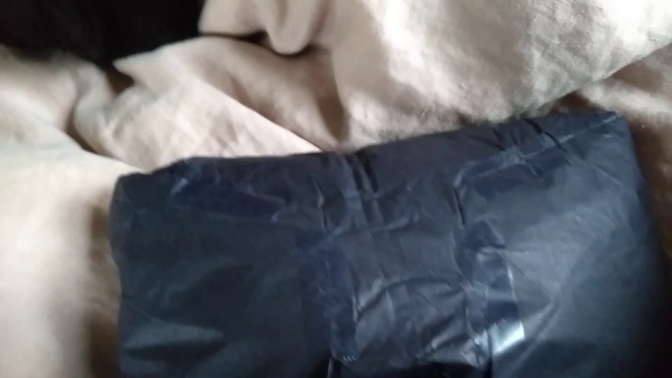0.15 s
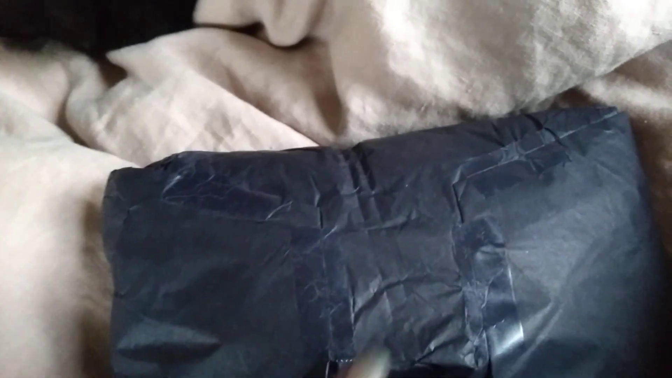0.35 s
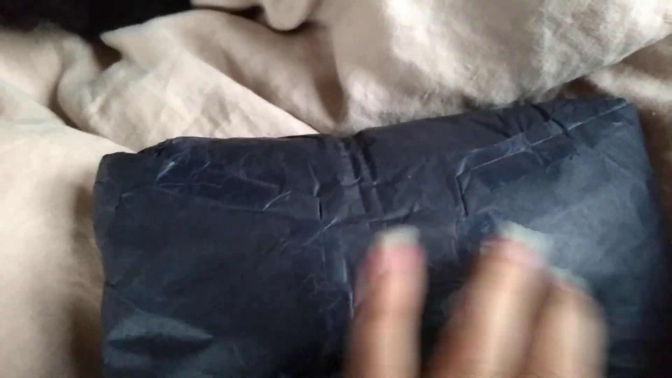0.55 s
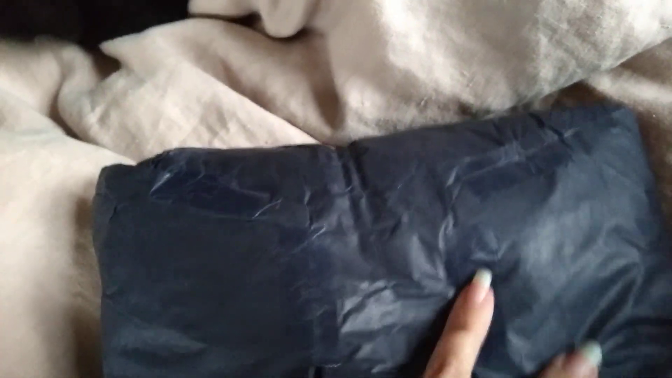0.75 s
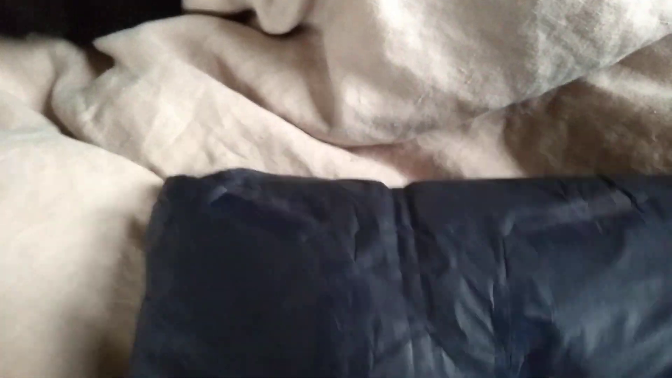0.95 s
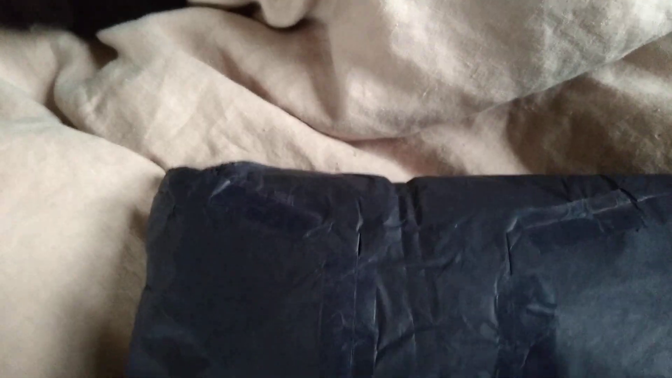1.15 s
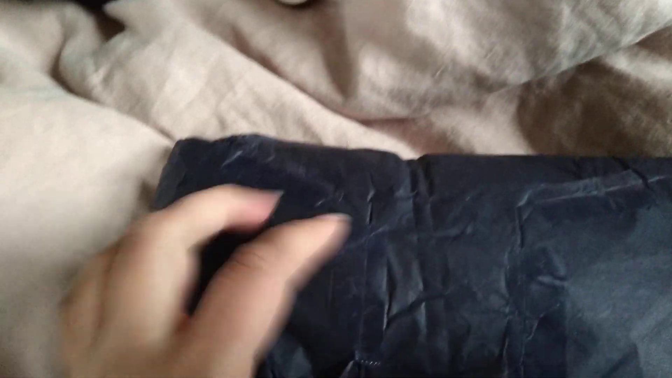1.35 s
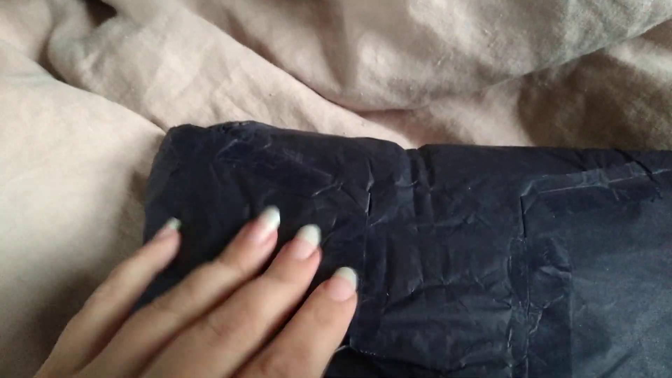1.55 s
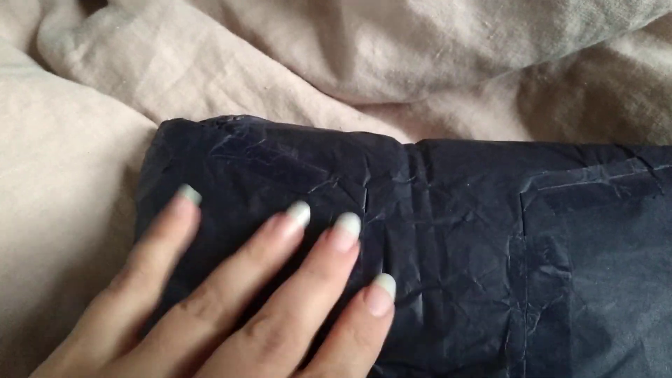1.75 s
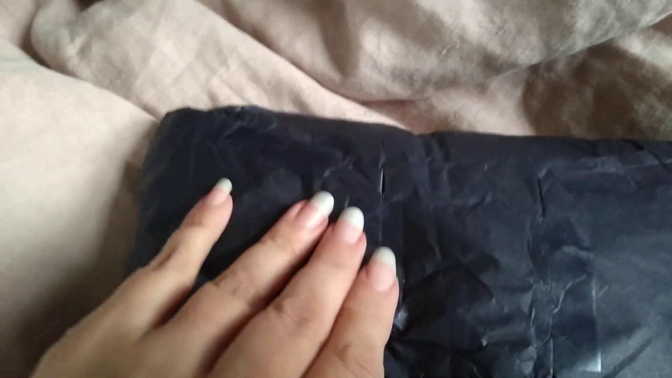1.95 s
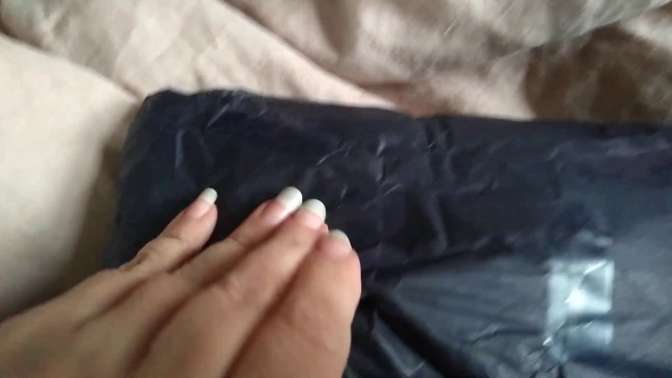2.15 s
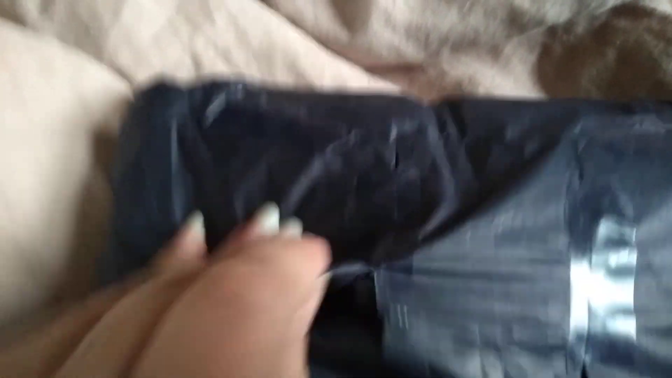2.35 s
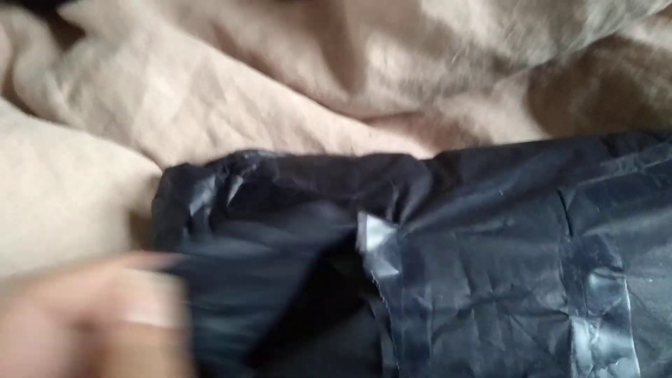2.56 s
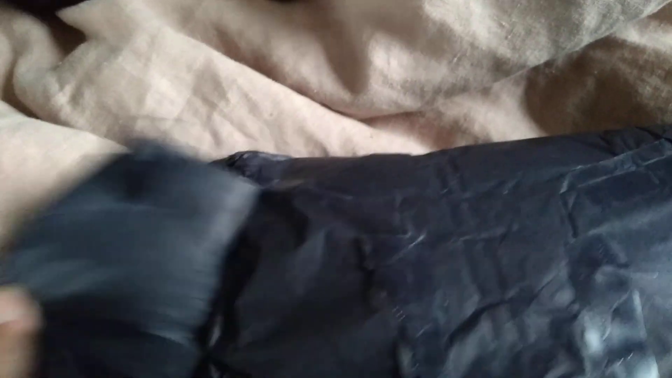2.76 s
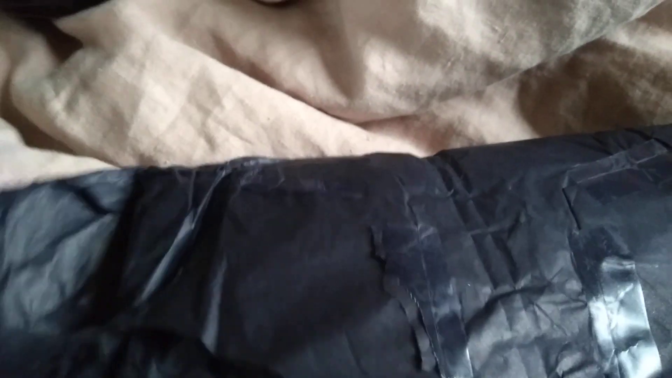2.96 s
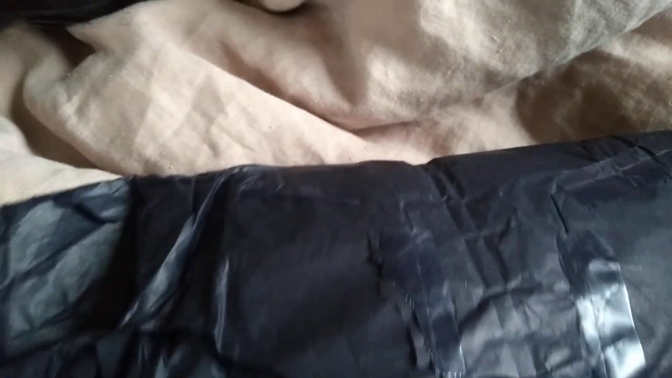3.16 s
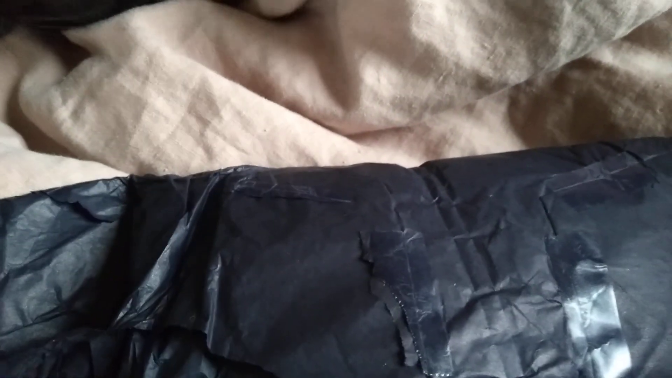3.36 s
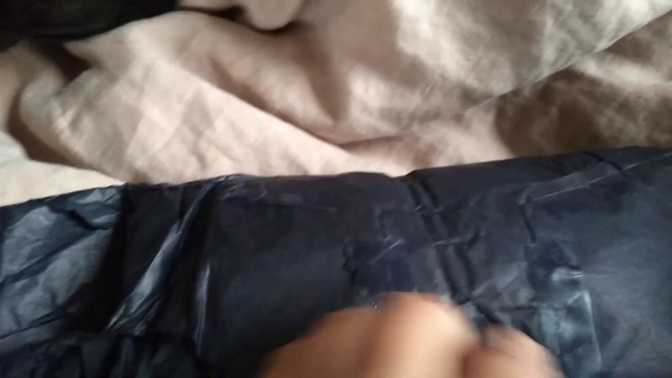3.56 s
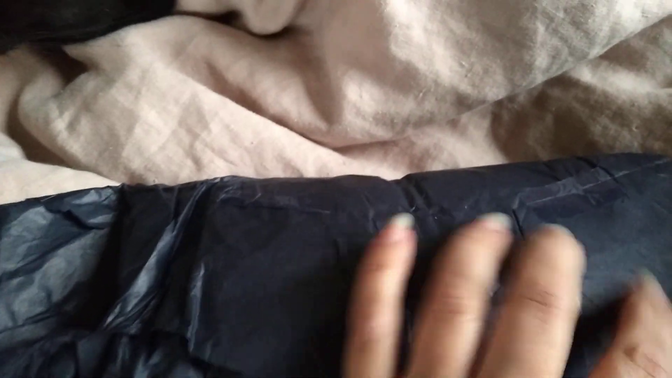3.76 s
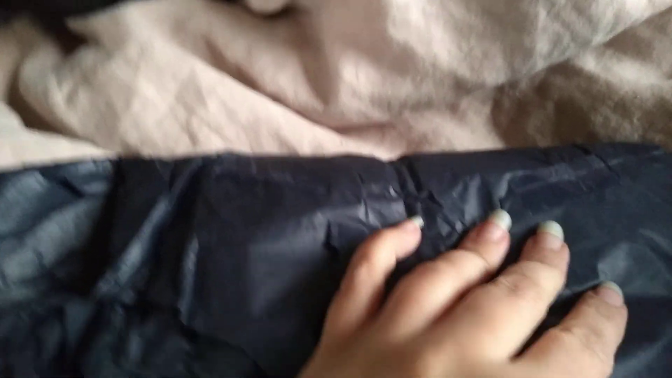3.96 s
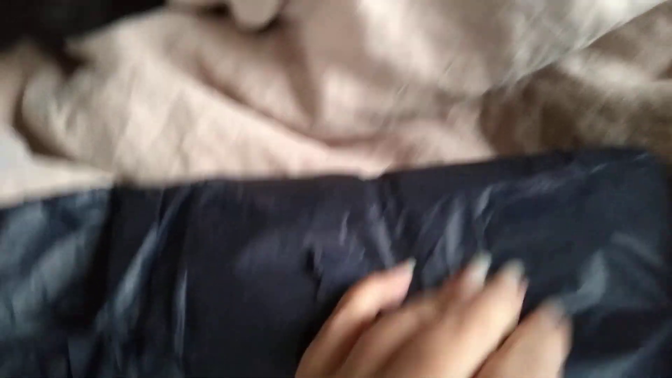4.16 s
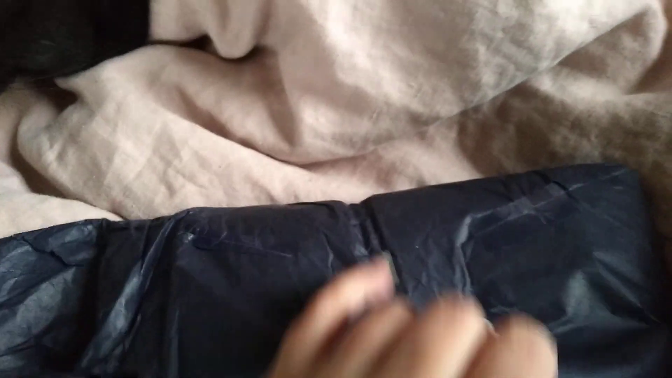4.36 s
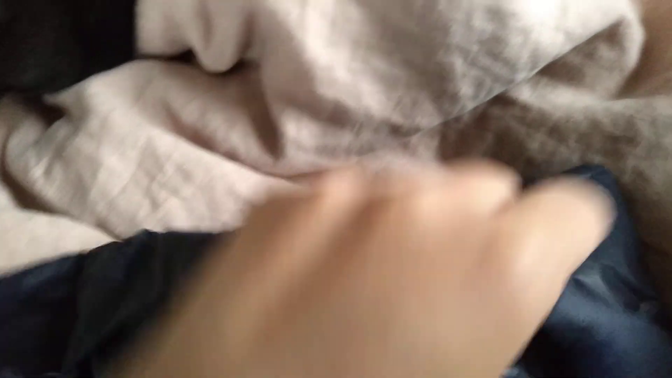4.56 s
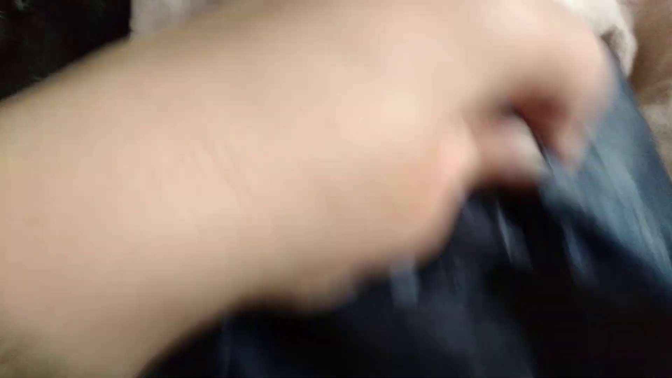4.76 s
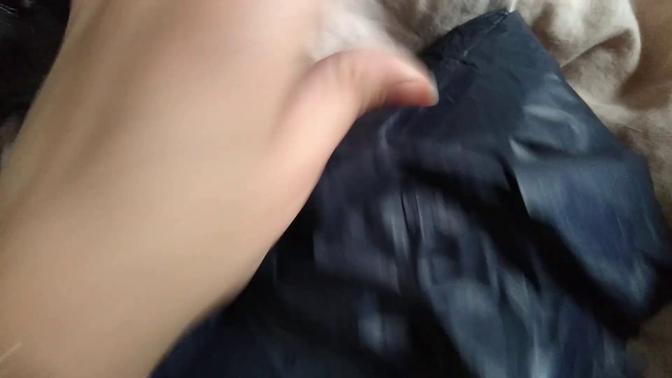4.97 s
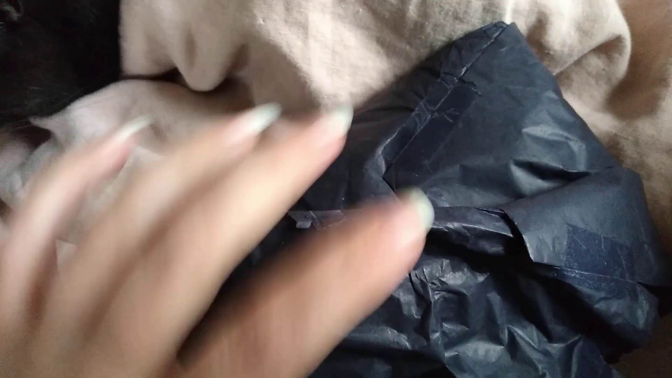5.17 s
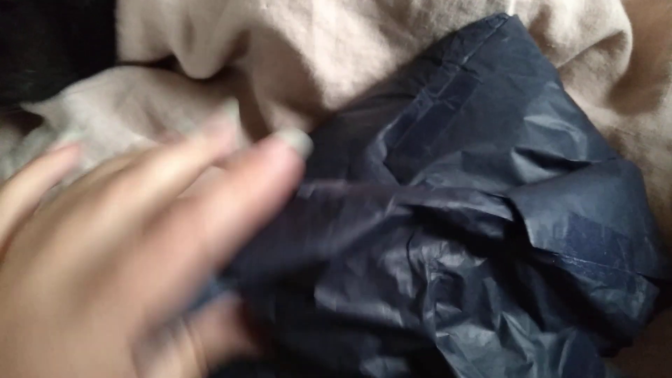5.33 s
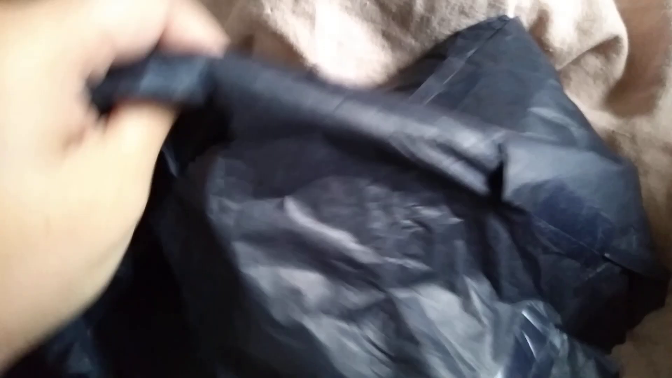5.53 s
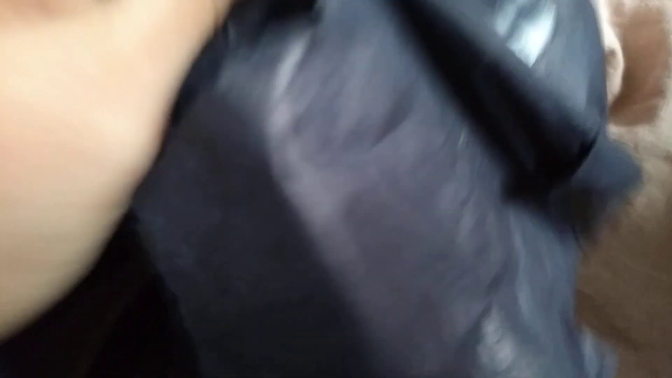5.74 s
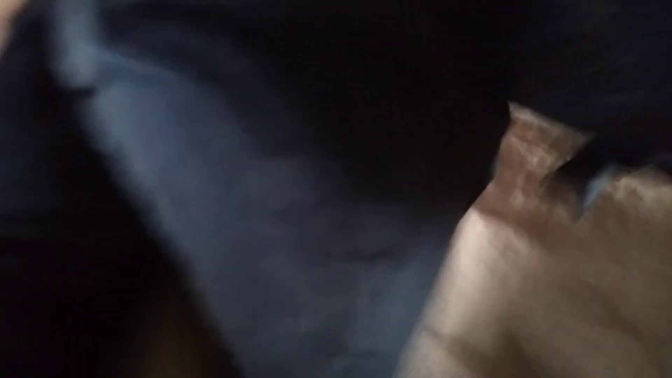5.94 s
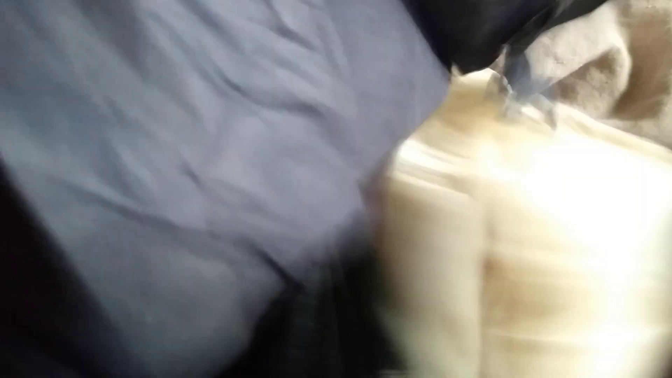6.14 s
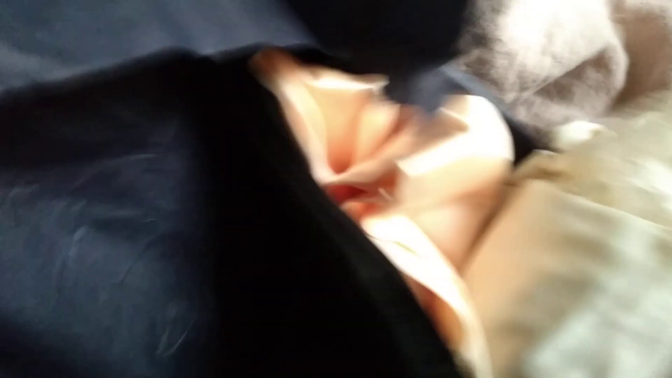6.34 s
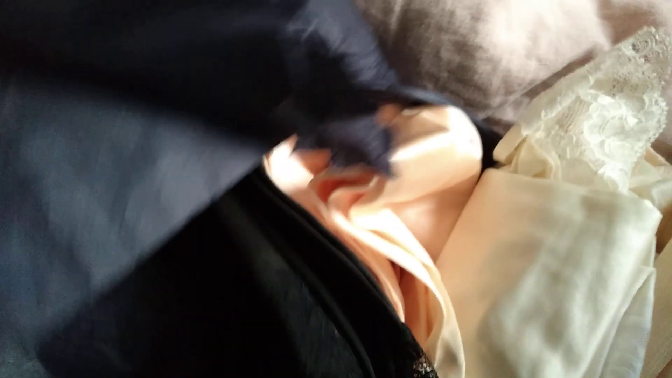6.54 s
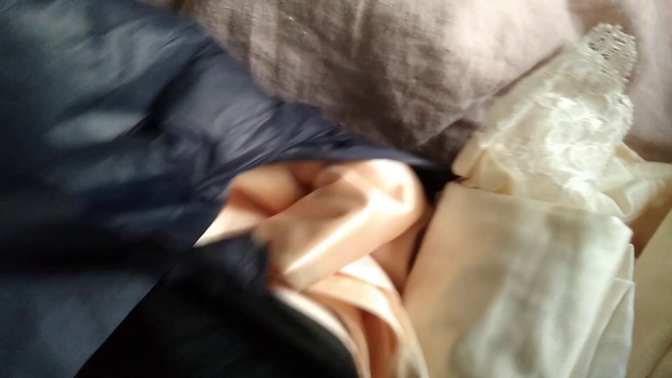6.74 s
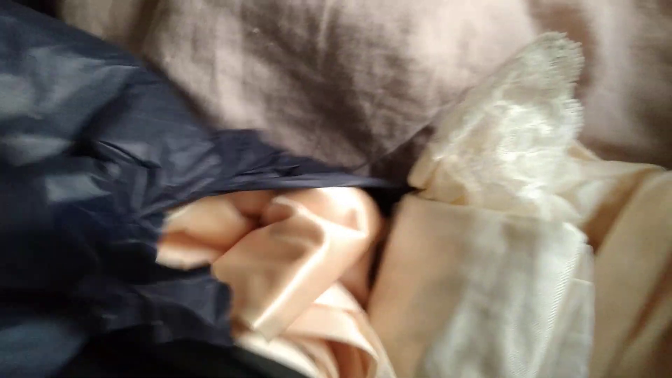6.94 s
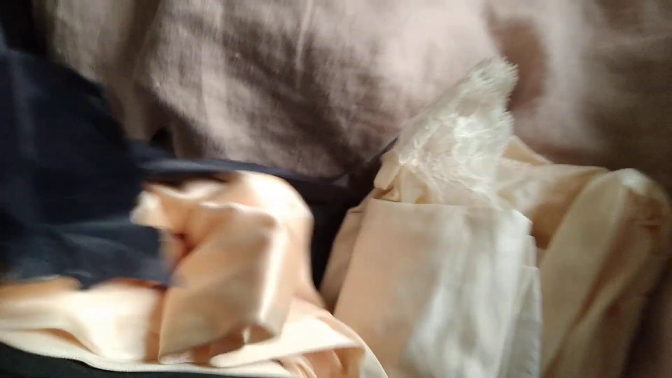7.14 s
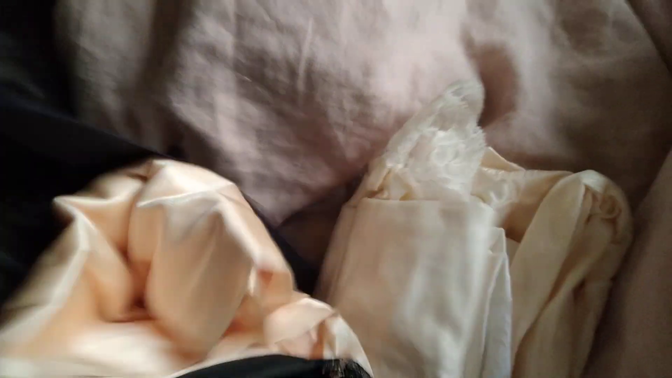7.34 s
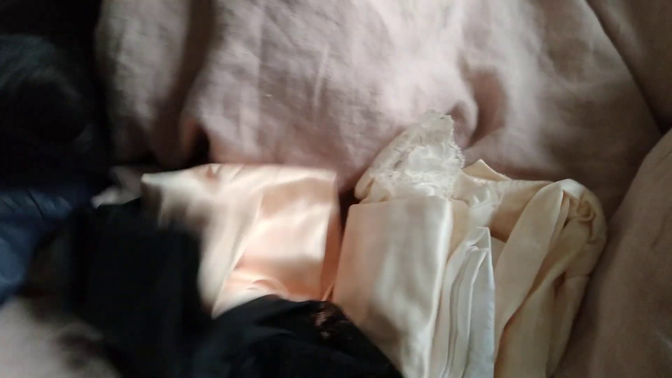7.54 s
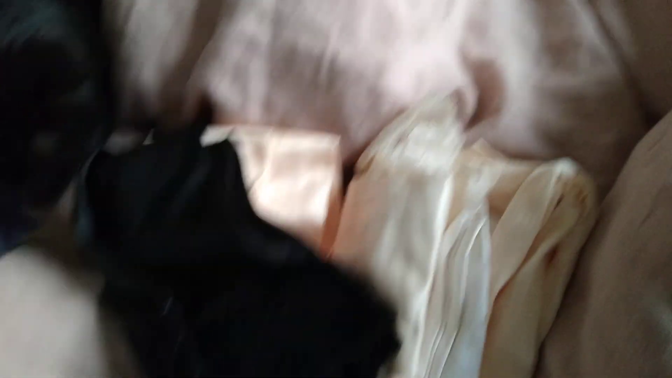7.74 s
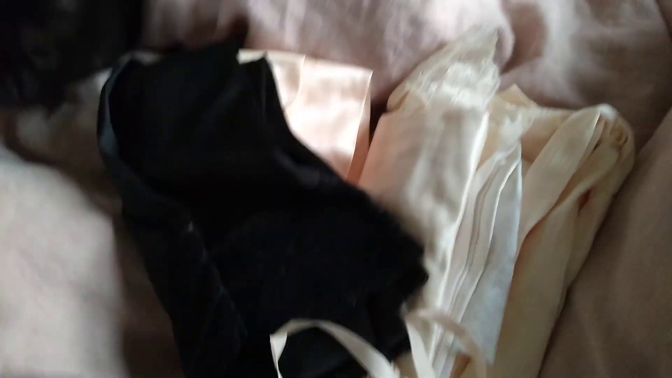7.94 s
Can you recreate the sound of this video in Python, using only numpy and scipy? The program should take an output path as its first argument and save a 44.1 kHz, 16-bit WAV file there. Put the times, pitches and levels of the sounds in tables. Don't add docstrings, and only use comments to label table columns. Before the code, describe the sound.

Bright, brittle crackle of thin wrapping in a soft, quiet room, recorded close in stereo by a phone with a ringing, sharp treble. Gentle uneven strokes come first, then a strong rip with dense snaps, a short hush, renewed rustling, and a long loud unfolding with low flapping thumps of air. It ends in sparse, faint settling crackles.

```python
import sys
import numpy as np
from scipy import signal
from scipy.io import wavfile
from scipy.ndimage import uniform_filter1d

SR = 44100
rng = np.random.default_rng(int(sys.argv[2]) if len(sys.argv) > 2 else 0)


def linear_from_db(decibels):
    return 10 ** (np.asarray(decibels, float) / 20)


def wav_record(signal):
    frames = np.transpose(np.atleast_2d(signal))
    bounded = np.clip(frames, -1, 1)
    quanta = np.round(bounded * 32767).astype(np.int16)
    wavfile.write(sys.argv[1], SR, quanta)


N = 352787


def rms_one(x):
    return x / np.sqrt(np.mean(x ** 2) + 1e-20)


def in_time(rows):
    seconds, *columns = np.transpose(rows)
    return [np.interp(np.arange(N) / SR, seconds, column) for column in columns]


def at_hz(points, hz):
    point_hz, value = np.transpose(points)
    return np.interp(np.log(hz), np.log(point_hz), value)


def drift(rate_hz):
    r = np.exp(-80 * np.pi * rate_hz / SR)
    white = rng.standard_normal(N // 40 + 2002)
    slow = signal.lfilter([1], [1, -2 * r, r * r], white)[2000:]
    return np.interp(np.arange(N) / 40, np.arange(len(slow)), rms_one(slow))


def bands():
    wide = np.geomspace(40, 5000, num=15)
    narrow = np.geomspace(5000, 18000, num=10)
    edges = np.concatenate([wide, narrow[1:]])
    return zip(edges, edges[1:])


def port_noise(lag):
    late = np.clip(np.arange(N) - np.round(lag).astype(int), 0, N - 1)
    return [(np.array([a[late], a]), np.array([b[late], -b])) for a, b in rng.standard_normal((2, 2, N))]


def band_noise(white, low, high, envelope):
    # f/Hz, correlation
    port_likeness = [(60, .85), (180, .92), (550, .92), (1100, .75), (2200, .58), (4500, .28), (9000, .05)]
    alike = np.clip(at_hz(port_likeness, np.sqrt(low * high)), -1, 1)
    shared, opposed = white
    pair = np.sqrt(1 + alike) * shared + np.sqrt(1 - alike) * opposed
    band = signal.butter(2, [low, high], "band", fs=SR, output="sos")
    return signal.sosfilt(band, pair * envelope)


def effort():
    # start/s, length/s, level at start/dB, level at end/dB
    hand_strokes = [(0.0, 0.18, -29.5, -43.5), (0.173, .2, -35.5, -33.5), (0.41, 0.076, -45.5, -41),
                    (0.54, 0.095, -31.5, -34), (0.653, 0.28, -28, -31), (1.006, 0.22, -36, -34.5),
                    (1.273, .12, -37, -35), (1.43, 0.095, -43.5, -37), (1.572, 0.14, -31.5, -43),
                    (1.742, 0.1, -42, -50.5), (1.896, 0.12, -54, -36), (2.12, 0.26, -40, -38.5),
                    (2.424, .19, -28.5, -14.5), (2.609, 0.16, -16, -18), (2.818, 0.086, -22, -20),
                    (2.954, 0.085, -25, -26), (3.106, 0.087, -34.5, -34.5), (3.29, 0.17, -63.5, -76.5),
                    (3.628, 0.1, -41, -33.5), (3.749, 0.045, -34, -29), (3.822, 0.1, -39, -35.5),
                     (3.965, 0.12, -28.5, -39.5), (4.13, 0.16, -39, -29), (4.332, 0.11, -37, -29),
                     (4.483, 0.097, -34, -32.5), (4.607, 0.23, -32.5, -24.5), (4.897, 0.079, -31, -29.5),
                     (4.989, 0.17, -39.5, -43.5), (5.238, 0.09, -53, -47), (5.318, .13, -35.5, -33.5),
                    (5.467, 0.21, -25.5, -24), (5.693, 0.21, -25.5, -22), (5.934, 0.27, -24.5, -23),
                    (6.241, 0.23, -27, -44.5), (6.462, 0.11, -28.5, -32), (6.598, .26, -32, -33.5),
                    (6.874, 0.23, -33.5, -30.5), (7.074, .22, -31.5, -29), (7.321, 0.12, -30.5, -29),
                    (7.446, 0.096, -39.5, -32), (7.558, 0.22, -39.5, -47), (7.798, 0.17, -49, -55.5)]
    attack_db_per_s, release_db_per_s = 751.5, 277.5
    t = np.arange(0, N + 40, 40) / SR
    power = 1e-10
    for start, length, first_db, last_db in hand_strokes:
        progress = np.clip((t - start) / max(length, .01), 0, 1)
        held_db = first_db + (last_db - first_db) * progress
        rise_db = attack_db_per_s * np.maximum(start - t, 0)
        fall_db = release_db_per_s * np.maximum(t - start - length, 0)
        power = power + linear_from_db(2 * (held_db - rise_db - fall_db))
    return np.interp(np.arange(N) / SR, t, 10 * np.log10(power))


def folds(effort_db):
    per_s, over_effort_db, spread_db, pan_db, sheet_db = 45, 10, 3, 5, -22
    gap, size, side, tone = rng.standard_normal((400, 4)).T
    start = np.cumsum(np.abs(gap)) * 1.25 / per_s
    db = np.interp(start * SR, np.arange(N), effort_db) + over_effort_db + spread_db * size
    rows = zip(start, db, pan_db * side, sheet_db + 2.5 * tone)
    return [row for row in rows if row[0] * SR < N - 1]


def crinkle(per_s, clump_db):
    chance = per_s * linear_from_db(clump_db * drift(25)) / SR
    at = np.flatnonzero(rng.random(N) < chance)[:N // 8]
    size, side, pitch = rng.random((N // 8, 3))[:len(at)].T
    size_db = 3.6 * np.minimum(-np.log(size + 1e-9), 3.4)
    pan_db = 10 * (side - .5) * [[1], [-1]]
    power = linear_from_db(2 * (size_db + pan_db))
    return at, power / np.mean(power) * SR / 16 / per_s, np.log2(300) + 5.8 * pitch


def burst(at, power, ms):
    r = np.exp(-1000 / (ms * SR))
    spikes = np.array([np.bincount(at, side, N) for side in power]) + 1e-18
    return signal.lfilter([np.e * (1 - r)], [1, -2 * r, r * r], spikes)


def large_snaps(rows, shortest_ms, longest_ms):
    treble, sheet = np.zeros((2, 2, N))
    lengths = shortest_ms + (longest_ms - shortest_ms) * rng.random((500, 1))[:, 0]
    for (start, db, pan_db, sheet_db), ms in zip(rows, lengths):
        i = round(start * SR)
        t = np.arange(min(600, N - i)) / SR * 1000 / max(ms, .2)
        pulse = (t * np.exp(1 - t)) ** 2
        snap = pulse * linear_from_db(2 * db + pan_db * np.array([[1], [-1]]))
        treble[:, i:i + len(t)] += snap
        sheet[:, i:i + len(t)] += snap * linear_from_db(2 * sheet_db)
    return treble, sheet


def paper():
    # f/Hz, level per Hz/dB
    paper_colour = [(26, -56), (45, -37), (72, -11), (120, -6.5), (328, -4), (462, -8), (719, -3),
                    (1500, -4.5), (2840, -7), (5370, -3), (7760, 1.5), (10200, 3), (12100, -2), (14700, -4),
                    (15800, -20)]
    # f/Hz, left-right/dB
    port_lean = [(60, -1), (240, -1), (480, -1.5), (950, 0), (1890, 4.5), (7300, 4.5), (10000, -4),
                 (14000, 2.5)]
    zone_hz = 100, 300, 1700, 2100, 3500, 6500
    zone_shares = [
        (1, 0, 0, 0, 0, 0),
        (0, 1, 1, 0, 0, 0),
        (0, 0, 0, 1, 1, 0),
        (0, 0, 0, 0, 0, 1),
    ]
    # t/s, slack/dB, weight on the parcel/dB, flapping/dB, left-right/dB
    grip = [(0.0, 6, 2.5, 5, -2), (.4, -1.5, -1, 2, -1), (.6, 0.5, -0.5, 0, 2), (1.25, 5.5, 5, 6, 1),
            (1.5, -10, 3, 3, 2.5), (2.35, 3, 0, -6, 2.5), (2.7, -2, -3.5, -4, -1), (3.2, 5, -5, -11, -6),
            (3.5, -5, -3, 2.5, 0), (3.7, 4.5, 3.5, 6, 5), (4.5, 5, 0, -12, 1), (4.9, 4.5, 2, 10, 2),
            (5.3, -0.5, -2.5, -14, 2.5), (5.65, 3, -0.5, 10.5, -1.5), (5.95, 1, -1, 3.5, -4),
            (6.3, 3, 1.5, 11, -1.5), (7.0, 2, -1.5, 5, -1.5), (8.0, 6, -1.5, 1, -5)]
    # t/s, delay of the left port/samples
    place = [(0, 10), (.45, 10), (.55, -2), (1.4, -2), (1.5, 8), (2.7, 9), (2.76, 13), (3.5, 13), (3.6, -1),
             (5.3, 1), (5.5, 13), (7, 14), (7.3, 17), (8, 13)]
    # t/s, peak/dB, left-right/dB, sheet re peak/dB
    crease_snaps = [(0.0697, -17, -10, -23), (0.2493, -14.5, -5, -12.5), (0.4363, -18.5, -0.5, -14),
                    (0.5267, -15, 11, -29), (0.5472, -16, 10, -23), (0.7781, -8.5, 0.5, -18),
                    (1.1927, -22, -9, -23), (1.5015, -22.5, 2, -15), (1.5673, -26, 3, -20),
                    (1.6737, -18, 10, -17), (2.2784, -12.5, -1, -14.5), (2.3548, -15, 5, -25),
                    (2.3835, -19, 2, -25), (2.4249, -12, 1.5, -30), (2.481, -9, 14, -16),
                    (2.5214, -4, 9, -22), (2.562, -2, 6, -29), (2.605, -10, 1.5, -10),
                    (2.8499, -0.5, -3, -22.5), (2.9992, 1, -5, -21), (3.034, -3, -6, -11.5),
                    (3.0639, -10, -3.5, -18), (3.074, -12.5, -2.5, -13.5), (3.1011, -6.5, -3.5, -14),
                    (3.1114, -13.5, -3, -14), (3.1396, -4, -2, -18), (3.168, -14, -2, -31),
                    (3.6027, -27.5, 3, -14), (3.774, -10.5, -3, -30), (3.86, -16, 0.0, -26),
                   (4.15, -16, -0.5, -23), (4.1723, -11.5, 1, -14.5), (4.2383, -15.5, 15, -8),
                   (4.366, -13, -6, -15), (4.4113, -11.5, -20, -17), (4.6533, -11.5, -7, -23),
                   (4.7242, -13, 9, -23), (4.811, -16, 5, -23), (5.456, -8.5, -1.5, -25),
                   (5.579, -3, -6, -12), (5.687, -8, -5.5, -25), (5.737, -7, -12, -23),
                   (5.878, -2, -17, -30), (5.945, -5, -2, -17), (5.972, -7, -8.0, -16),
                   (5.9774, -9, -9, -21), (6.0302, -8, -5.0, -23), (6.061, -13, -11, -27),
                   (6.1429, -9, -9, -23), (6.4532, -17, -3.5, -23), (6.7202, -13, -1.0, -9),
                   (6.776, -13, -1, -7), (6.9022, -8.5, 6, -21), (7.092, -12.5, -5, -16),
                   (7.33, -12, -4.0, -16)]
    # t/s, peak/dB, left-right/dB, sheet re peak/dB
    ticks = [(1.7804, -20.5, -11, -20), (1.8837, -27, 0, -16), (2.1028, -26, 2.0, -8),
             (3.237, -22.5, -2, -25), (3.271, -33, -8, -25), (3.3782, -40, -1, -12), (3.4104, -35, -1, -17),
             (3.4434, -53, -4.5, -19), (3.4804, -55, -0.5, -18), (3.5395, -40.5, -1, -21),
             (5.1217, -19.5, -2, -11), (5.245, -28, 3, -20), (6.3864, -20, -9, -26), (7.5965, -22, -7, -20),
             (7.645, -20, 0, -20), (7.699, -27, -14, -26), (7.7278, -25, -10.5, -22),
             (7.7275, -16, -4.0, -24), (7.756, -30, -4.0, -18), (7.8406, -33, -5.0, -20),
             (7.8393, -27.5, -2, -12), (7.892, -24, -9, -36), (7.9217, -25, 0, -12),
             (7.9944, -31, -9.5, -18)]

    treble_db = effort()
    slack_db, weight_db, flap_db, pan_db = in_time(grip)
    body_db = weight_db - 0.056 * (treble_db + 32)
    rows = crease_snaps + ticks + folds(treble_db)
    at, power, pitch = crinkle(per_s=1200.0, clump_db=4)
    big_treble, big_sheet = large_snaps(rows, shortest_ms=.5, longest_ms=1.0)
    white = port_noise(lag=in_time(place)[0])
    gust = drift(6.0)
    side = np.array([[.5], [-.5]])
    out = 0
    for k, (low, high) in enumerate(bands()):
        hz = np.sqrt(low * high)
        air, body, sheet, treble = [np.interp(np.log(hz), np.log(zone_hz), share) for share in zone_shares]
        near = 0.12 + np.exp(-((pitch - np.log2(hz)) / 1.2) ** 2)
        small = burst(at, power * near, ms=.3) * linear_from_db(-14.0)
        sliding = linear_from_db(-15) * linear_from_db(4.0 * gust + 3.5 * drift(20))
        colour_db = sheet * slack_db + body * body_db + air * flap_db
        lean_db = side * pan_db * (1 - 0.35 * (body + air))
        level_db = treble_db + colour_db + lean_db
        big = treble * big_treble + (sheet + .5 * body) * big_sheet * linear_from_db(22.5)
        envelope = np.sqrt(linear_from_db(2 * level_db) * (small + sliding) + linear_from_db(-23.5) * big)
        band_gain = linear_from_db(at_hz(paper_colour, hz) + side * at_hz(port_lean, hz))
        out = out + band_gain * band_noise(white[k % 2], low, high, envelope)
    return linear_from_db(3.5) * out


def hum():
    # f/Hz, level/dB
    hum_lines = [(91, -14), (133, 0), (265, -12)]
    sag_per_s = .008
    gate_db, gate_follows, gate_s, gate_shut_db = -48, 0.67, .25, -80.5
    surge_s, surge_db, surge_dies_db_per_s = 1.27, -56.5, 27
    t = np.arange(N) / SR
    turns = t * (1.03 - sag_per_s * t / 2)
    lines = 0
    for hz, db in hum_lines:
        level = linear_from_db(db + 2.0 * drift(5.2))
        lines = lines + level * np.sin(2 * np.pi * hz * turns + 1.7 * drift(1.7))
    open_db = gate_db + gate_follows * uniform_filter1d(effort(), max(int(gate_s * SR), 1))
    dying_db = surge_dies_db_per_s * np.maximum(t - surge_s, 0)
    rising_db = 150 * np.maximum(surge_s - t, 0)
    return (linear_from_db(open_db) + linear_from_db(surge_db - dying_db - rising_db) + linear_from_db(gate_shut_db)) * lines


def room_tone():
    # f/Hz, level per Hz/dB
    room_colour = [(24, -49), (40, -17), (137, -1), (199, -26.5), (1760, -32), (2570, -20), (5580, -21),
                   (7730, -21), (16000, -26)]
    white = port_noise(lag=np.zeros(N))
    tone = 0
    for k, (low, high) in enumerate(bands()):
        band_gain = linear_from_db(at_hz(room_colour, np.sqrt(low * high)))
        tone = tone + band_gain * band_noise(white[k % 2], low, high, 1)
    return linear_from_db(-77) * rms_one(tone)


def scene():
    return paper() + hum() + room_tone()


def band_limit(x):
    return signal.sosfilt(signal.butter(12, 16510, fs=SR, output="sos"), x)


def record(dry):
    # f/Hz, width/Hz, level/dB
    port_peaks = [(1870, 270, 0), (2510, 760, 3), (5800, 3600, -5.5), (8000, 2000, 4.5), (10370, 930, 6.5)]
    for hz, width_hz, db in port_peaks:
        ring = signal.lfilter(*signal.iirpeak(hz, hz / width_hz, SR), dry)
        dry = dry + (linear_from_db(db) - 1) * ring
    rounded = .9 * np.tanh(dry / .9)
    top_cut = signal.ellip(12, .5, 60, 15760, fs=SR, output="sos")
    return band_limit(signal.sosfilt(top_cut, rounded))


dry = scene()
out = record(dry)
wav_record(out)
```